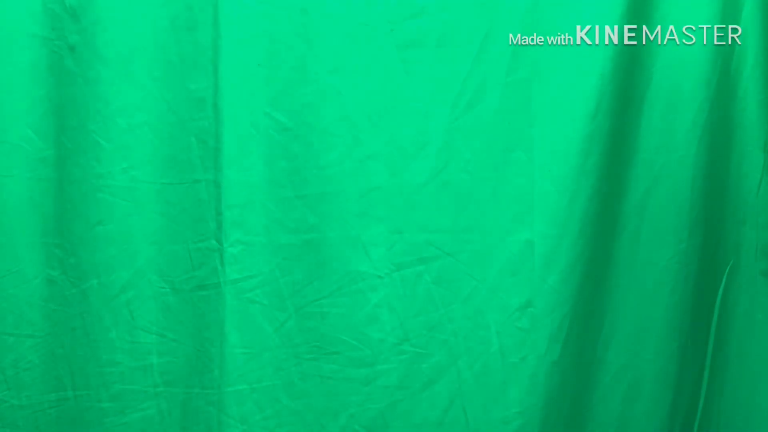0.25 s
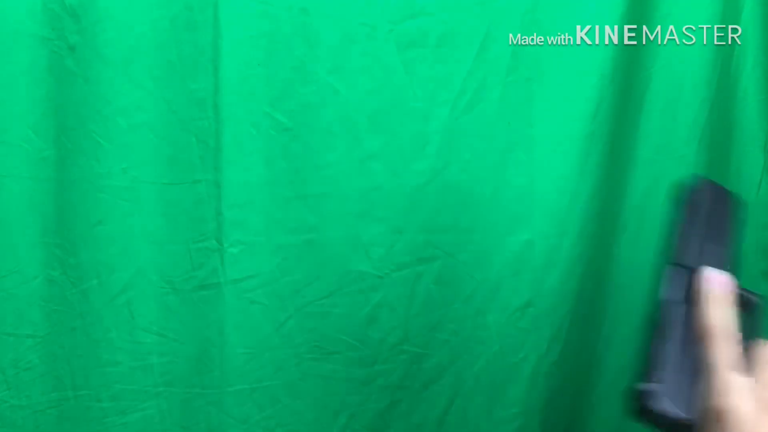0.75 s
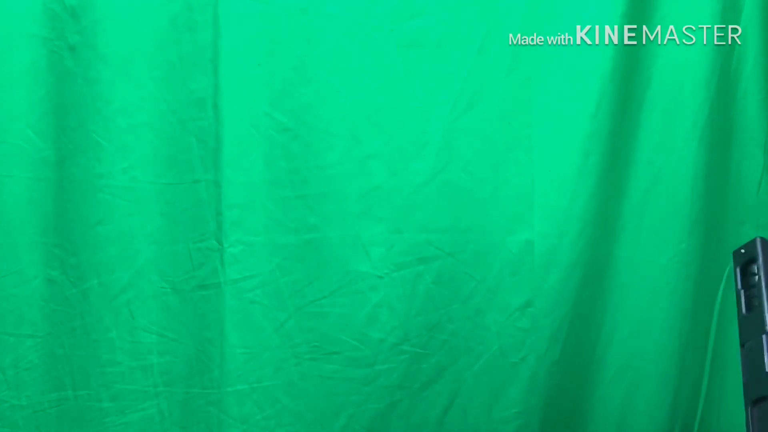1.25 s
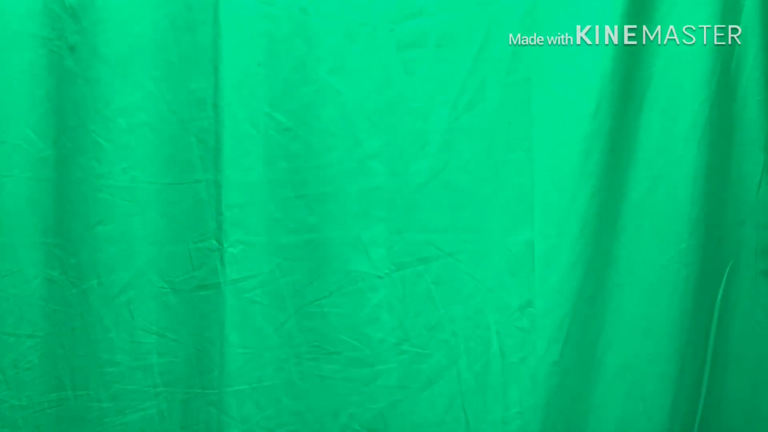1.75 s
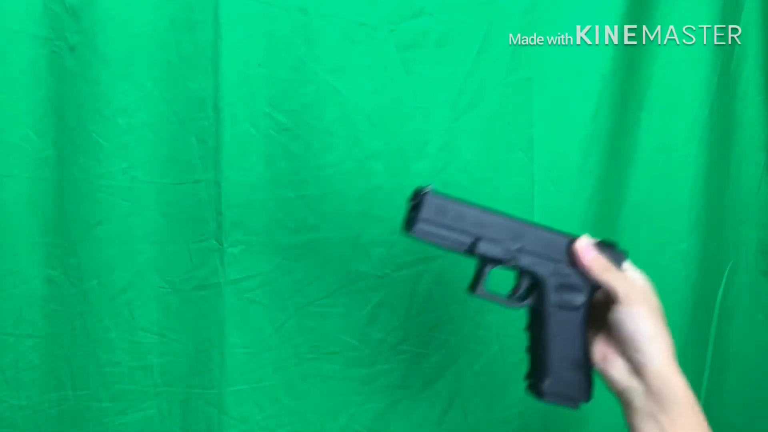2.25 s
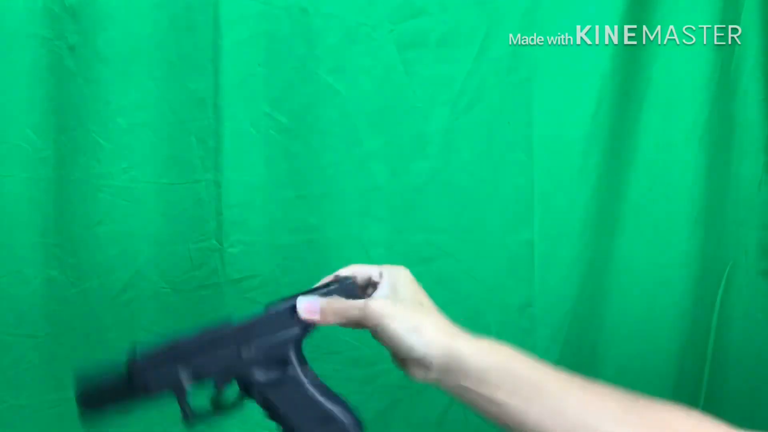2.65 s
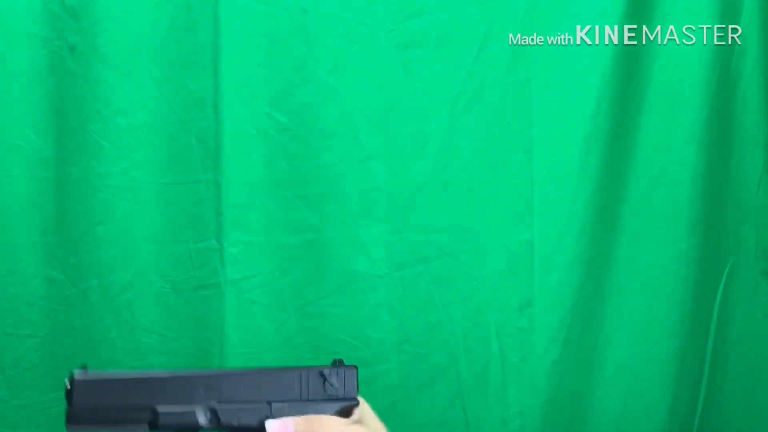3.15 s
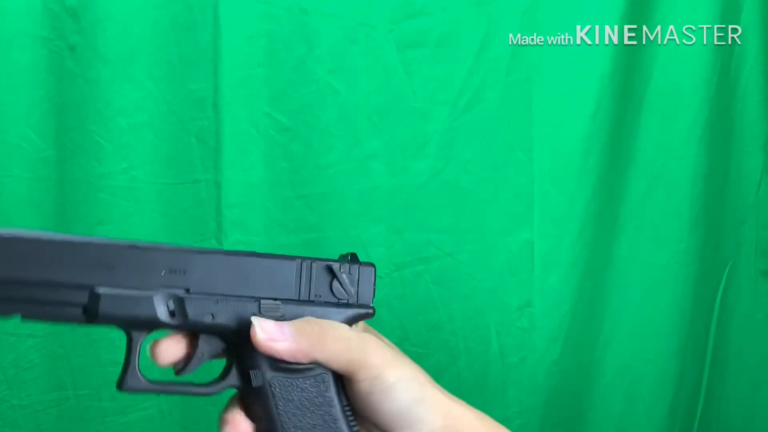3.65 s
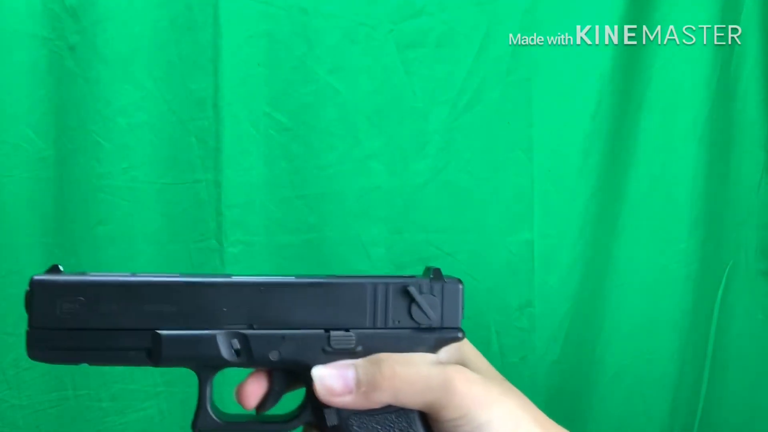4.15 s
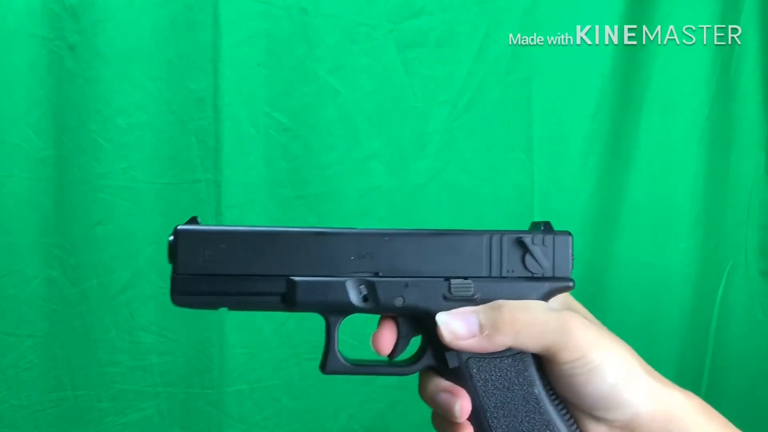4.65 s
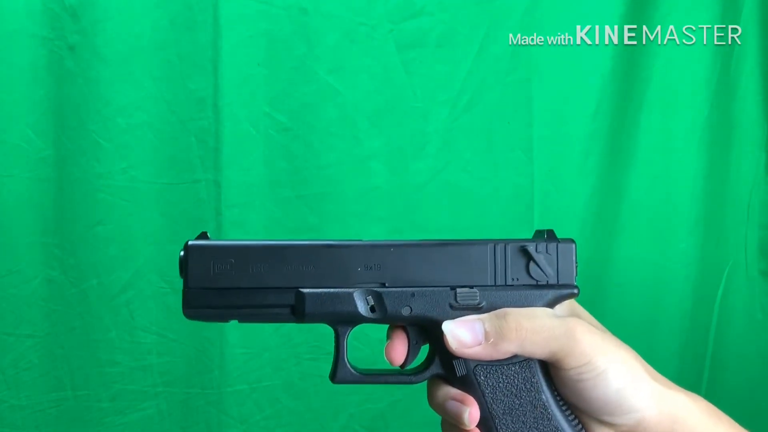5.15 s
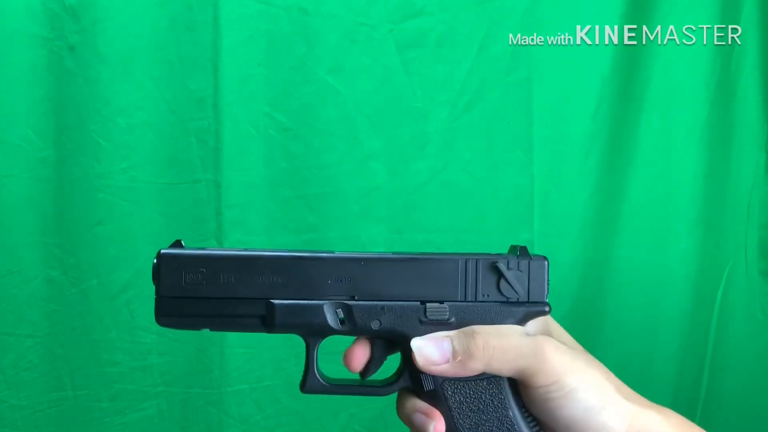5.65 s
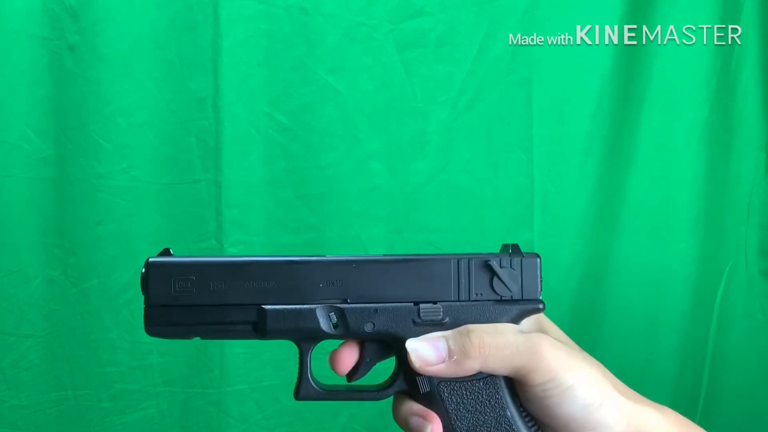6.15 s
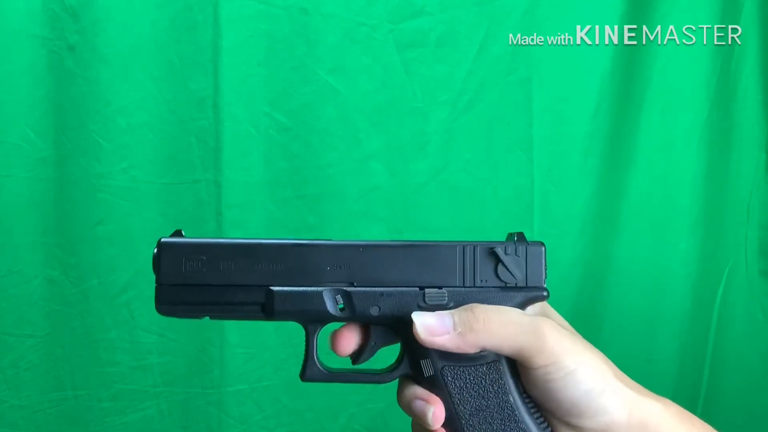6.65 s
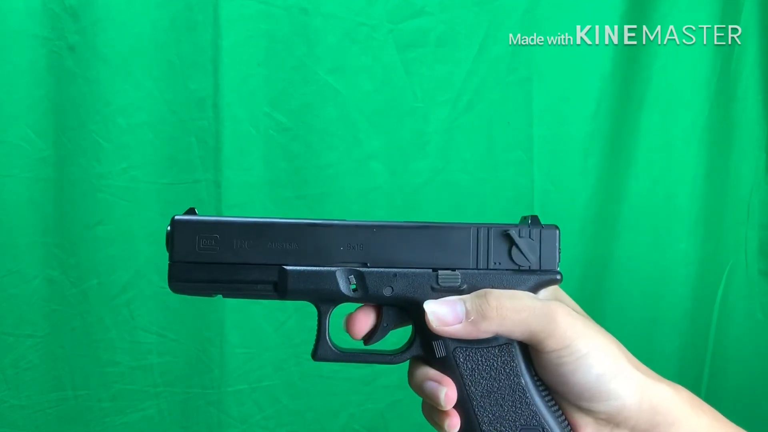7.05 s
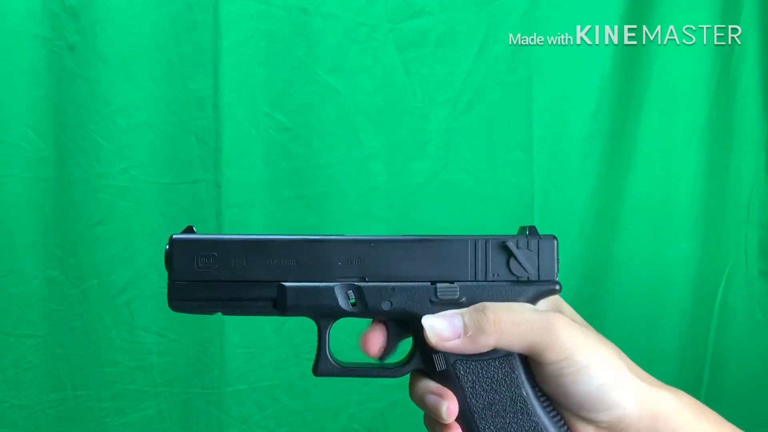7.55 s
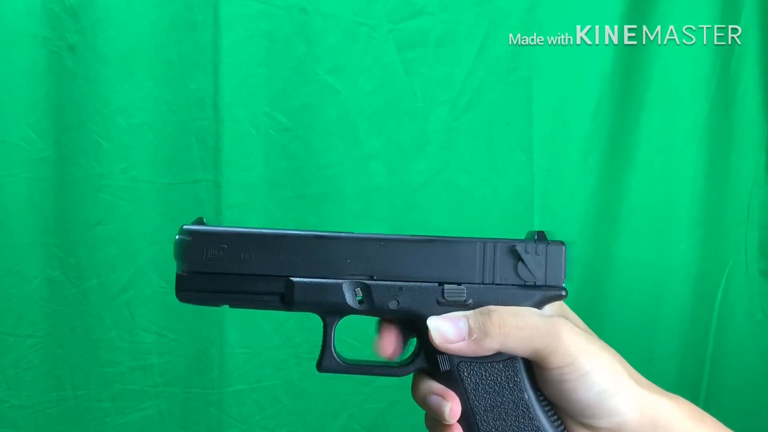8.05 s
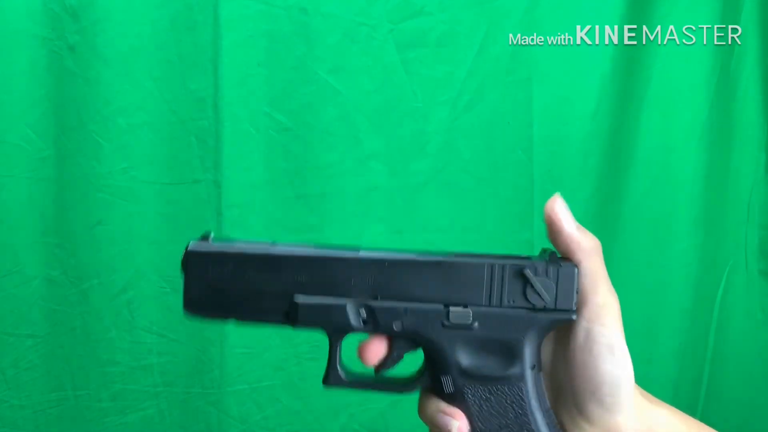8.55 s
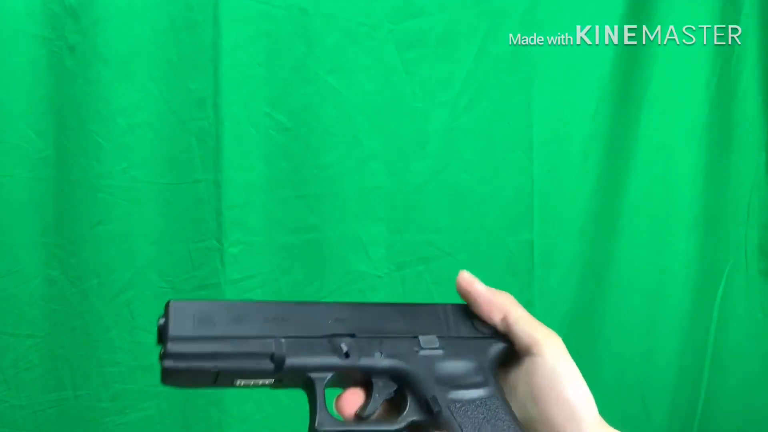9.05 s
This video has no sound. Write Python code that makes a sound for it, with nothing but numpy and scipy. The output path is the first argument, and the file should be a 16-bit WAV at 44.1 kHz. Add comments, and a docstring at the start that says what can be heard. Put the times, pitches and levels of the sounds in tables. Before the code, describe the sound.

A gas-powered toy pistol is handled near a phone-like microphone. Faint rubs and hollow taps lead to a magazine click, then a loud rattling slide rack. Six short shots follow, sharp metal snaps with a popping puff of gas and brief hiss, air bumping the microphone. Short bright room reflections surround them over a quiet low rumble.

```python
"""In a small room, a gas-blowback airsoft pistol is handled near a phone.
The magazine clicks home, the slide is racked, then six shots are fired: each is a hammer crack,
a rush of gas, the slide striking its rear stop and slamming shut, and the click of the trigger resetting.
Contacts are short noise bursts with damped resonances, gas is slowing or rising tones and shaped hiss,
and friction is unevenly gated noise; diffuse reflections and a quiet rumble surround them."""
import sys
import numpy as np
from scipy import signal
from scipy.fft import rfft, irfft, next_fast_len
from scipy.io import wavfile
from scipy.ndimage import uniform_filter1d, minimum_filter1d

SR = 44100
rng = np.random.default_rng(int(sys.argv[2]) if len(sys.argv) > 2 else 0)


def output_pcm(signal):
    """Save a mono or channel-first signal as 16-bit PCM at the path in sys.argv[1].

    Samples are clipped to [-1, 1] before scaling.
    """
    pcm = np.clip(np.atleast_2d(signal).T, -1, 1) * 32767
    wavfile.write(sys.argv[1], SR, np.round(pcm).astype(np.int16))


N = 409688


def amp(db):
    """Logarithmic level: decibels to amplitude gain."""
    return 10 ** (np.asarray(db) / 20)


def unit(x):
    """Normalisation of the signal power: scale to rms 1."""
    return x / np.sqrt(np.mean(x ** 2) + 1e-20)


def along(points, hz):
    """Interpolation of (frequency [Hz], value) points on a logarithmic frequency axis."""
    point_hz, values = np.transpose(points)
    return np.interp(np.log(hz + 1), np.log(point_hz + 1), values)


def filtered(x, gain):
    """Linear filtering: multiply the spectrum by a gain that depends on frequency."""
    length = x.shape[-1]
    size = next_fast_len(length + SR // 20)
    spectrum = rfft(x, size) * gain(np.fft.rfftfreq(size, 1 / SR))
    return irfft(spectrum, size)[..., :length]


def noise(spectrum, size):
    """Spectral shaping: white noise coloured by a spectrum, rms 1."""
    white = rng.standard_normal(size)
    return unit(filtered(white, lambda hz: amp(along(spectrum, hz))))


def pair(draw, apart):
    """Partial coherence: left and right share one draw and differ by a second."""
    common = draw()
    difference = apart * np.array([[1], [-1]]) * draw()
    return (common + difference) / np.hypot(1, apart)


def fade(t, t60):
    """Exponential decay: the level falls by 60 dB in t60 seconds."""
    return np.exp(-np.log(1000) * t / np.maximum(t60, 1e-4))


def burst(t, length):
    """Impact envelope: a cluster of micro-impacts swells to its peak at `length` seconds and stops."""
    return t / length * np.exp((1 - (t / length) ** 2) / 2)


def chatter(size, depth_db):
    """Stick-slip friction: the uneven grip of two sliding surfaces as a spiky gain of rms 1."""
    grip = unit(uniform_filter1d(rng.standard_normal(size), size=110))
    return unit(amp(depth_db * grip))


def add(track, s, x):
    """Superposition: mix x into the track at s seconds."""
    start = max(round(s * SR), 0)
    part = track[..., start:start + x.shape[-1]]
    part += x[..., :part.shape[-1]]


# spectrum of the background rumble: (frequency [Hz], gain [dB])
FLOOR_SPECTRUM = [(12, -30.5), (20, -5.5), (86, -2.5), (198, -17), (422, -23.5), (472, -28.5), (574, -27.5),
                  (1260, -34.5), (1480, -38.5), (14300, -48.5), (16000, -63.5)]


def floor():
    """Stationary noise: a nearly coherent quiet rumble that sinks from 5.4 s to 8.4 s."""
    level_db = np.interp(np.arange(N) / SR, [5.4, 8.4], [-66.5, -78])
    return amp(level_db) * pair(lambda: noise(FLOOR_SPECTRUM, size=N), apart=0.053)


# reverberation time of the room: (frequency [Hz], decay by 60 dB [s])
ROOM_T60 = [(100, 0.31), (400, 0.38), (1500, 0.31), (5000, 0.29), (9000, 0.28), (15000, 0.073)]


def room_tail():
    """Diffuse reverberation: reflections build up after the first wall and die by band."""
    hz, t, bands = signal.stft(rng.standard_normal(SR // 2), SR, nperseg=256)
    decaying = bands * fade(t, along(ROOM_T60, hz)[:, None])
    tail = signal.istft(decaying, SR, nperseg=256)[1]
    tail_t = np.arange(len(tail)) / SR
    tail = tail * (1 - np.exp(-(tail_t / 0.0032) ** 2))
    return tail / np.linalg.norm(tail)


# colour of the reflections: (frequency [Hz], gain [dB])
ROOM_GAIN = [(40, -17), (130, -12.5), (310, -7), (430, -3), (650, -7), (1200, -4.5), (3000, -1),
             (8500, -3.5), (15000, -0.5)]
# stereo width of the reflections: (frequency [Hz], side over mid [dB])
ROOM_WIDTH = [(120, -14), (400, -5.5), (1500, -0.5), (6000, 1), (13000, -4)]


def room(x):
    """Time-varying convolution: the pistol moves, so reflections change; their bass is alike in both ports."""
    out, step = np.zeros((2, N)), SR // 25
    tails = [np.array([room_tail(), room_tail()]) for _ in range(7)]
    for k, start in enumerate(range(0, N, step)):
        tail = tails[k % len(tails)]
        add(out, start / SR, signal.fftconvolve(x[None, start:start + step], tail, axes=1))

    def mid_side_gain(hz):
        width = np.array([np.ones_like(hz), amp(along(ROOM_WIDTH, hz))])
        return amp(along(ROOM_GAIN, hz)) * width / np.linalg.norm(width, axis=0)

    mid, side = filtered(out, mid_side_gain)
    return np.array([mid + side, mid - side])


# strokes of the skin over the grip: (time of the peak [s], relative level [dB], rise [s])
STROKES = [(0.534, -54, 0.102), (1.504, -71, 0.11), (1.782, -56.5, 0.15), (1.9, -64, 0.203),
           (2.111, -62, 0.5), (4.28, -77, .8), (4.542, -56, 0.13), (9.262, -65.5, 0.058)]
# spectrum of skin on the stippled grip: (frequency [Hz], gain [dB])
SKIN_SPECTRUM = [(300, -8), (1500, -8), (4000, -8), (7000, -7), (9000, 0), (15000, -9)]
STROKE_SWELL_DB, STROKE_RELEASE_S = 31, 0.19  # growth over the rise; decay by 60 dB after the peak


def rubbing():
    """Sliding friction: skin crosses the stippled grip in small catches; each stroke swells and lets go."""
    t = np.arange(N) / SR
    strokes_db = []
    for s, db, rise in STROKES:
        swell_db = STROKE_SWELL_DB * (s - t) / rise
        release_db = 60 * (t - s) / STROKE_RELEASE_S
        strokes_db.append(db - np.where(t < s, swell_db, release_db))
    level = amp(np.max(strokes_db, axis=0) - 0.5)
    return level * chatter(N, depth_db=3.5) * pair(lambda: noise(SKIN_SPECTRUM, size=N), apart=0.4)


# light taps of fingers and loose parts:
# (time [s], relative level of the hollow body [dB], relative level of the tick [dB])
TAPS = [(0.5516, -46, -46), (1.8911, -45, -53.5), (2.0727, -48, -54.5), (2.0936, -41.5, -48),
        (3.2116, -48, -56), (3.2214, -58, -52), (3.4386, -58.5, -57), (3.9084, -62.5, -92),
        (4.8429, -53, -79), (5.1213, -63.5, -90), (6.3525, -54.5, -51.5), (6.7346, -43.5, -39),
        (7.2848, -59, -55), (8.0426, -55, -50), (8.6906, -50, -59), (8.9146, -58, -73.5),
        (9.0723, -57.5, -82.5)]
# spans in which the fingers shift their hold: (start [s], end [s])
FIDGETS = [(3.13, 3.42), (8.76, 9.24)]
# resonance of the hollow plastic grip: (frequency [Hz], gain [dB])
HOLLOW_SPECTRUM = [(250, -22), (1000, -14), (1450, -1), (1850, 0), (2200, -11), (5000, -28.5), (12000, -58)]
# spectrum of a loose part's tick: (frequency [Hz], gain [dB])
TICK_SPECTRUM = [(800, -21.5), (3000, -1.5), (6500, -4), (8600, -2), (15000, -6.5)]
FIDGET_COUNT, FIDGET_BODY_DB, FIDGET_TICK_DB = 4, -63.5, -75.5  # taps per shift; relative levels
TAP_S, SOFT_TAP_S = .002, 0.0041  # time to the peak of a crisp tap and of a soft one


def taps():
    """Cavity resonance: touches wake the hollow grip, soft ones more slowly; loose parts add a tick."""
    out, t = np.zeros((2, N)), np.arange(SR // 10) / SR
    faint = []
    for start, end in FIDGETS:
        for k in range(FIDGET_COUNT):
            s = start + (end - start) * (k + rng.random()) / FIDGET_COUNT
            faint.append((s, FIDGET_BODY_DB, FIDGET_TICK_DB))
    for s, body_db, tick_db in list(TAPS) + faint:
        shift = rng.uniform(0.84, 1.08)  # the fingers detune the cavity
        grip = [(hz * shift, db) for hz, db in HOLLOW_SPECTRUM]
        length = np.interp(body_db - tick_db, [0, 20], [TAP_S, SOFT_TAP_S])
        body_shape = burst(t, length) + amp(-12) * fade(t, 0.09)
        body = pair(lambda: noise(grip, size=len(t)), apart=0.7) * body_shape
        tick_shape = burst(t, length) + amp(-8) * fade(t, .08)
        tick = pair(lambda: noise(TICK_SPECTRUM, size=len(t)), apart=1.0) * tick_shape
        add(out, s, amp(body_db - 4.5) * body + amp(tick_db + 0.5) * tick)
    return out


# the frame's dull clunk: (frequency [Hz], gain [dB])
BODY_SPECTRUM = [(100, -11), (230, -5), (420, -0.5), (700, -2), (1200, -6.5), (2200, -16.5), (6000, -23.5)]
# the magazine bumping into the grip: (time [s], level [dB])
BUMPS = [(0.553, -46), (0.858, -44.5), (0.897, -39), (1.055, -42)]


def bumps():
    """Low-frequency impact: the heavy magazine gives the frame a dull clunk."""
    out, t = np.zeros((2, N)), np.arange(SR // 10) / SR
    for s, db in BUMPS:
        clunk = pair(lambda: noise(BODY_SPECTRUM, size=len(t)), apart=0.42) * burst(t, length=.003)
        add(out, s, amp(db) * clunk)
    return out


# spectrum of metal on metal: (frequency [Hz], gain [dB])
METAL_SPECTRUM = [(150, -31), (450, -12.5), (900, -2), (1900, 2), (2700, -2.5), (4000, -3), (6500, -1),
                  (8400, -4), (11000, -3.5), (15000, -6)]
# magazine and slide scraping along their rails:
# (start [s], end [s], level at the start [dB], level at the end [dB])
SCRAPES = [(0.791, 0.857, -68, -58), (0.854, 0.894, -36.5, -43.5), (0.991, 1.057, -61, -44),
           (2.615, 2.624, -61, -44), (2.704, 2.728, -43, -22.5), (2.727, 2.781, -28.5, -22),
           (2.907, 2.953, -38.5, -25), (5.807, 5.835, -57, -56.5), (6.19, 6.213, -45.5, -53),
           (6.948, 6.976, -67, -61), (8.689, 8.715, -60.5, -75.5)]


def scrapes():
    """Dry friction: metal drags on its rails, catching as it goes."""
    out = np.zeros((2, N))
    for start, end, start_db, end_db in SCRAPES:
        size = max(round((end - start) * SR), 256)
        drag = amp(np.linspace(start_db, end_db, size)) * chatter(size, depth_db=4.0)
        add(out, start, drag * pair(lambda: noise(METAL_SPECTRUM, size=size), apart=0.45))
    return out


# modes of slide and frame: (mean frequency [Hz], width [Hz], mean level [dB])
FRAME_MODES = [(1440, 190, 5), (1880, 61, 1), (3440, 250, -4), (5956, 560, -6), (8200, 250, -1.5),
               (10800, 870, -3)]


def frame_ring(size):
    """Modal superposition: crowded, well damped modes of slide and frame, struck at a new place each time."""
    modes = [(centre * rng.normal(1, 0.038), width, db + rng.normal(0, 4.2))
             for centre, width, db in FRAME_MODES]

    def response(hz):
        return sum(amp(db) / (1 + ((hz - centre) / width) ** 2) for centre, width, db in modes)

    return unit(filtered(rng.standard_normal(size), response))


def contact(knock_db, edge_db, note_hz, note_db, length, ring_db, ring_t60, apart):
    """Impact excitation: a crack, a short frame ring and one resonance favoured by the contact point."""
    t = np.arange(SR // 10) / SR
    crack = pair(lambda: noise(METAL_SPECTRUM, size=len(t)), apart) * burst(t, length)
    ring_shape = fade(t, ring_t60) * np.minimum(t / length, 1)
    ring = pair(lambda: frame_ring(size=len(t)), apart) * ring_shape
    # the knock tilts the bass, the edge tilts the treble
    hardness = [(1800, knock_db), (3500, 0.00021), (7500, 0.00077), (11000, edge_db)]

    def colour(hz):
        note = note_db / (1 + ((hz - note_hz) / (0.11 * note_hz)) ** 2)
        return amp(along(hardness, hz) + note)

    hit = filtered(crack + amp(ring_db) * ring, colour)
    return hit / np.std(hit[:, t < .003])  # rms 1 during the crack


# crisp clicks of the trigger and catches: (time [s], relative level [dB])
TRIGGER_CLICKS = [(5.5279, -14.5), (6.0503, -16), (6.589, -17.5), (7.4974, -20.5), (7.6962, -43),
                  (7.83, -23), (8.1691, -39), (8.2884, -25.5), (9.269, -45)]


def trigger():
    """Damped impact: the small sear snaps with hardly any ring."""
    out = np.zeros((2, N))
    for s, db in TRIGGER_CLICKS:
        snap = contact(knock_db=-5.5, edge_db=6.5, note_hz=9000, note_db=5, length=0.0011,
                       ring_db=-24.0, ring_t60=0.059, apart=0.52)
        add(out, s, amp(db - 0.5) * snap)
    return out


# magazine and slide worked by hand; a catch ticks just before each blow:
# (time [s], relative level [dB], relative knock [dB], relative edge [dB],
#  strongest resonance [Hz], its height [dB], lead of the catch [s])
HAND_CLACKS = [(0.8985, -21, -10.5, -3.5, 3840, 13, 0.0088), (1.0547, -13.5, -14.5, 4.5, 6900, 2.5, .022),
               (2.6271, -37.5, 4.5, -7, 4560, 6, .003), (2.6986, -39, 5, -1.5, 1808, 7, .001),
               (2.7251, -12, -2.5, 1, 1199, 5.5, .010), (2.7467, -14, -12.5, 6, 9076, 5, .0048),
               (2.7726, -4, -11.5, -3.5, 8440, 4, .016), (2.9224, -20, -8.5, -2.5, 8040, 5, .008),
               (2.9401, -14, -11, -5, 6200, 5.5, .002), (2.9477, -12, -6, 0.5, 2037, 8.5, .005),
               (3.101, -33, -3, -5.5, 8400, 4.5, .002)]
CATCH_DB, CATCH_KNOCK_DB = -13.5, 3  # the catch is weaker and duller than the blow after it
VALVE_S, REAR_STOP_S = 0.0017, .024  # delays after the hammer
FEED_LEAD_S, BOUNCE_S = .009, .003  # the slide meets the barrel before it shuts, then bounces
HAMMER_DB, VALVE_DB = -17.5, -16.5  # on the same relative scale as the clacks
FEED_DB, BOUNCE_DB = -4.5, 0.5  # relative to the slide shutting
HAMMER_EDGE_DB, SHOT_NOTE_DB = 0, 4.5  # relative treble of the hammer; resonance height in every shot
# relative knock and edge, and resonance: slide on its rear stop and on the barrel, then slamming shut
REAR_KNOCK_DB, REAR_EDGE_DB, REAR_HZ = -9, .5, 8856
SHUT_KNOCK_DB, SHUT_EDGE_DB, SHUT_HZ = -7, 0, 2020


def contacts():
    """Impact sequence: hard contacts as (s, level dB, knock dB, edge dB, resonance Hz, its height dB)."""
    for s, db, knock_db, edge_db, note_hz, note_db, lead in HAND_CLACKS:
        yield s - lead, db + CATCH_DB, knock_db + CATCH_KNOCK_DB, edge_db, note_hz, note_db
        yield s, db, knock_db, edge_db, note_hz, note_db
    rear = REAR_KNOCK_DB, REAR_EDGE_DB, REAR_HZ, SHOT_NOTE_DB
    shut = SHUT_KNOCK_DB, SHUT_EDGE_DB, SHUT_HZ, SHOT_NOTE_DB
    for s, knock_db, hammer_hz, rear_db, travel, shut_db, *_ in SHOTS:
        hammer = knock_db, HAMMER_EDGE_DB, hammer_hz, SHOT_NOTE_DB
        yield (s, HAMMER_DB, *hammer)
        yield (s + VALVE_S, VALVE_DB, *hammer)
        yield (s + REAR_STOP_S, rear_db, *rear)
        yield (s + travel - FEED_LEAD_S, shut_db + FEED_DB, *rear)
        yield (s + travel, shut_db, *shut)
        yield (s + travel + BOUNCE_S, shut_db + BOUNCE_DB, *shut)


def clacks():
    """Collision: metal parts hit their stops, by hand and in the shots."""
    out = np.zeros((2, N))
    for s, db, knock_db, edge_db, note_hz, note_db in contacts():
        hit = contact(knock_db + 1.5, edge_db + 4, note_hz, note_db, length=0.0017,
                      ring_db=-11.5, ring_t60=0.083, apart=1.0)
        add(out, s, amp(db + 3.5) * hit)
    return out


# puffs of air and gas that reach the microphone: (time of the peak [s], peak level [dB], width [s])
PUFFS = [(2.885, -35, .013), (5.441, -17, 0.0059), (5.985, -41.5, .009), (6.532, -22, 0.0089),
         (7.371, -8, 0.0076), (7.762, -10, 0.0096), (8.228, -8, .009)]
# dull after-thuds that leave a low boom: (time [s], thud level [dB], boom level [dB])
THUDS = [(5.591, -24.5, -28), (6.58, -54, -35.5), (7.563, -37, -44), (7.827, -45.5, -38.5),
         (7.947, -39, -61.5), (8.353, -42, -39.5)]


def buffets():
    """Pressure pulse: each puff pushes on the microphone between two lulls; thuds leave a low boom."""
    out, t = np.zeros(N), np.arange(SR) / SR
    for s, db, width in PUFFS:
        u = (t - .5) / width
        add(out, s - .5, amp(db) * (1 - 2 * u ** 2) * np.exp(-u ** 2))
    boom_hz, thud_hz = 44, 130
    boom = np.sin(2 * np.pi * boom_hz * t) * fade(t, 0.62) * np.minimum(t * boom_hz, 1)
    thud = np.sin(2 * np.pi * thud_hz * t) * fade(t, 0.02)
    for s, thud_db, boom_db in THUDS:
        add(out, s, amp(boom_db) * boom)
        add(out, s, amp(thud_db) * thud)
    return out


def blast(t60, start_hz, stretch):
    """Gas expansion: a pressure swing that slows with every cycle."""
    t = np.arange(SR // 5) / SR
    cycles = start_hz * stretch * np.log1p(t / stretch)
    return np.sin(2 * np.pi * cycles) * fade(t, t60)


def uncork(pop_hz, chamber_hz, chamber_db):
    """Cavity resonance: the cylinder pops open and its note rises as the slide uncovers it."""
    t = np.arange(SR // 10) / SR
    pop = -np.sin(2 * np.pi * pop_hz * t) * np.exp(-((t - .0012) / 0.0013) ** 2)
    pitch = chamber_hz + (pop_hz - chamber_hz) * np.exp(-t / 0.0054)
    chamber = np.sin(2 * np.pi * np.cumsum(pitch) / SR) * fade(t, 0.15)
    return pop + amp(chamber_db) * chamber


# spectrum of the rushing gas: (frequency [Hz], gain [dB])
GAS_SPECTRUM = [(130, -14), (280, -7.5), (450, -4.5), (900, -12.5), (1500, -11.5), (2400, -13), (4000, -9),
                (7000, -9), (8500, -6.5), (15000, -17.5)]
GAS_DELAY_S, BLAST_T60_S = .0025, 0.27  # from hammer to blast; decay of the blast by 60 dB
GAS_SAG_T60_S = 1  # the pressure sinks while the gas flows
# shots, also read by contacts():
# (hammer falls [s], its relative knock [dB], its resonance [Hz], relative level of the rear stop [dB],
#  slide shuts after [s], relative level of shutting [dB], blast level [dB], cylinder uncorks after [s],
#  pop level [dB], relative hiss level [dB], full hiss lasts [s])
SHOTS = [(5.3935, -5.5, 3000, -21, .0555, -16, -13, .021, -14.5, -17, .14),
         (5.9104, -10, 7030, -12.5, .051, -13.5, -25.5, .014, -7, -18, 0.11),
         (6.4645, -14, 8400, -13.5, .055, -15, -19.5, .014, -10.5, -19.5, .10),
         (7.3441, -9.5, 7650, -13, .057, -12, -15, .012, -12.5, -18.5, .066),
         (7.7296, -2, 1190, -15.5, .057, -15, -14.5, 0.012, -11.5, -18.5, .055),
         (8.1957, -2, 1200, -14.5, .0575, -16, -13, .012, -15, -18, 0.019)]


def shots():
    """Gas discharge and recoil: the frame clunks, gas blasts and pops, then hisses out as the slide rattles."""
    out, t = np.zeros((2, N)), np.arange(SR // 4) / SR
    for s, *_, blast_db, uncorks, pop_db, hiss_db, hold in SHOTS:
        valve, opened = s + GAS_DELAY_S, s + uncorks
        clunk = pair(lambda: noise(BODY_SPECTRUM, size=len(t)), apart=0.16) * burst(t, length=0.0094)
        add(out, valve - .014, amp(blast_db - 12.5) * clunk)
        recoil = pair(lambda: noise(BODY_SPECTRUM, size=len(t)), apart=.2) * burst(t, length=.006)
        add(out, opened, amp(-23) * recoil)
        add(out, valve, amp(blast_db) * blast(BLAST_T60_S, start_hz=1127, stretch=.00068))
        add(out, opened, amp(pop_db) * uncork(pop_hz=562, chamber_hz=1576, chamber_db=-12.0))
        rise = .012  # s; the hiss is full when the blast starts
        flow = np.minimum(t / rise, 1) ** 2 * fade(np.maximum(t - rise - hold, 0), .05)
        rattle = chatter(len(t), depth_db=3)
        hiss = rattle * pair(lambda: noise(GAS_SPECTRUM, size=len(t)), apart=0.56)
        add(out, valve - rise, amp(hiss_db - 3.5) * flow * fade(t, GAS_SAG_T60_S) * hiss)
    return out


def scene():
    """Direct and reverberant field: the pistol, its room, buffets of air and a quiet rumble."""
    pistol = clacks() + bumps() + taps() + scrapes() + shots() + rubbing()
    clicks = trigger()
    wet = room((amp(-1.0) * pistol + amp(-2.0) * clicks).mean(axis=0))
    return pistol + clicks + wet + buffets() + floor()


# narrow dips of the microphone ports: (frequency [Hz], width [Hz], depth [dB])
PORT_DIPS = [(11240, 460, -11.5), (13550, 130, -18.5)]
# difference between the ports: (frequency [Hz], left minus right [dB])
PORT_LEAN = [(500, 1), (1200, -1.5), (3000, 0), (7000, 0), (8300, 13), (9800, 2.5), (14000, -1.5)]
PORT_LAG_S, TOP_HZ = .000015, 15900  # the left port hears later; steep upper cutoff


def record(dry):
    """Interaural-like differences and limiting: two ports, the right nearer; the phone limits and cuts the top."""
    side = np.array([[.5], [-.5]])

    def ports(hz):
        dips_db = sum(db * np.exp(-((hz - centre) / width) ** 2) for centre, width, db in PORT_DIPS)
        lag = np.exp(-2j * np.pi * hz * PORT_LAG_S * side)
        return amp(dips_db + side * along(PORT_LEAN, hz)) * lag

    x = filtered(dry, ports)
    # the limiter ducks at once and recovers at a steady 400 dB/s
    excess_db = 20 * np.log10(np.maximum(np.abs(x).max(axis=0) / .92, 1))
    recovery_db = 400 * np.arange(N) / SR
    duck_db = recovery_db - np.maximum.accumulate(excess_db + recovery_db)
    # hold the lowest gain over 40 samples, then smooth its corners
    gain = uniform_filter1d(minimum_filter1d(amp(duck_db), size=40), size=40)
    return filtered(x * gain, lambda hz: 1 / (1 + (hz / TOP_HZ) ** 120))


dry = scene()
out = record(dry)
output_pcm(out)
```